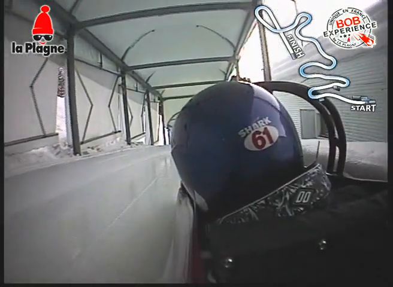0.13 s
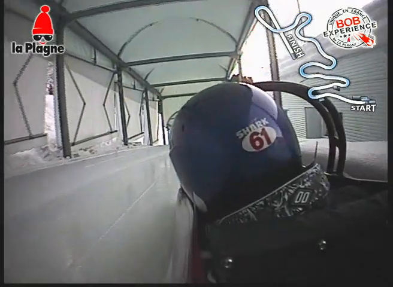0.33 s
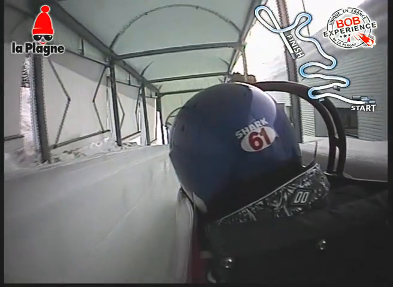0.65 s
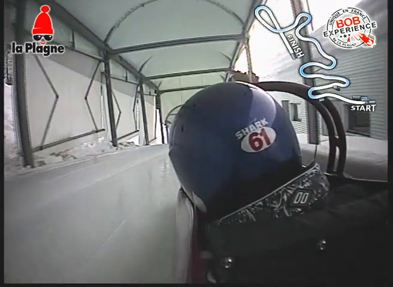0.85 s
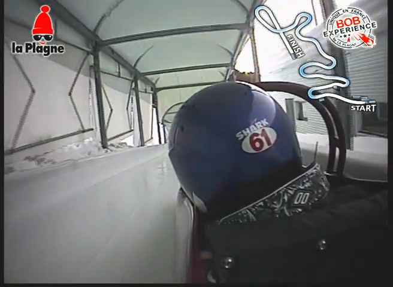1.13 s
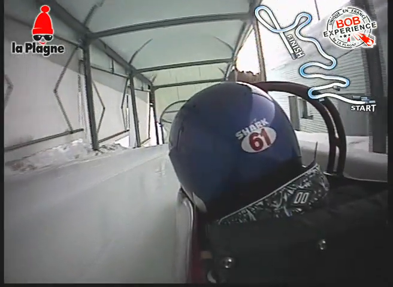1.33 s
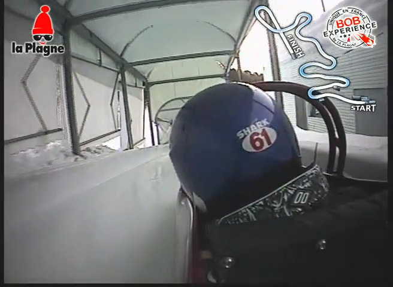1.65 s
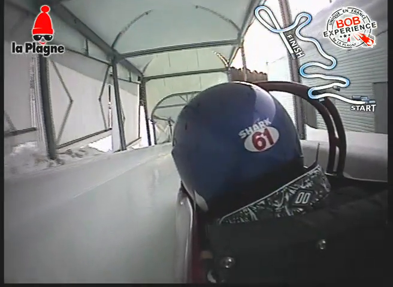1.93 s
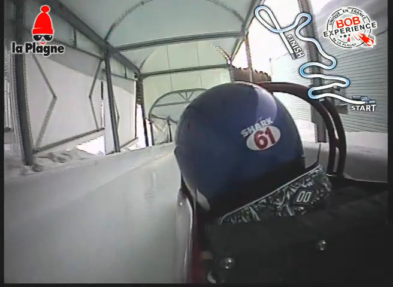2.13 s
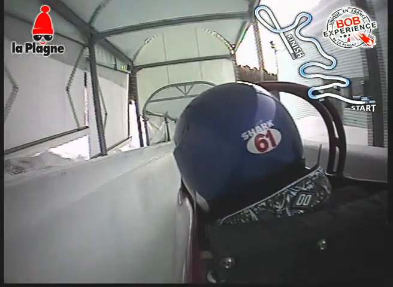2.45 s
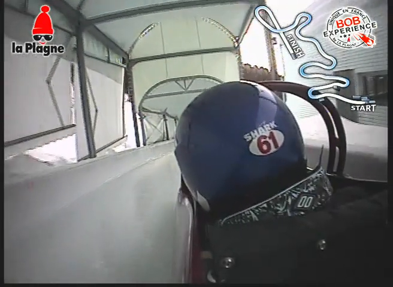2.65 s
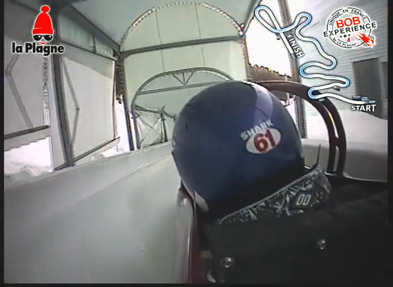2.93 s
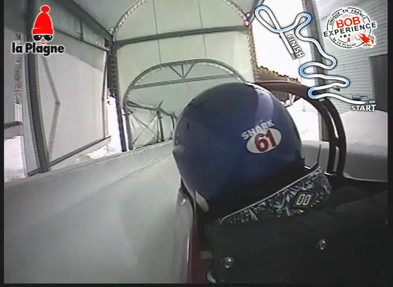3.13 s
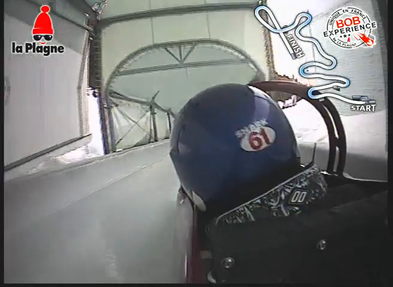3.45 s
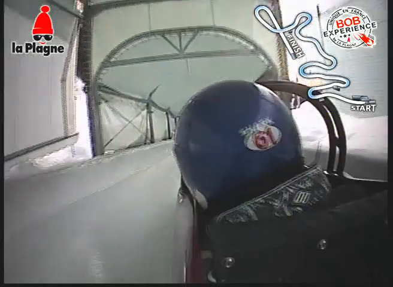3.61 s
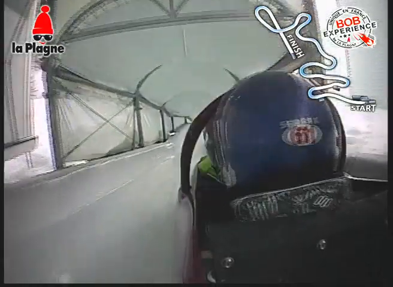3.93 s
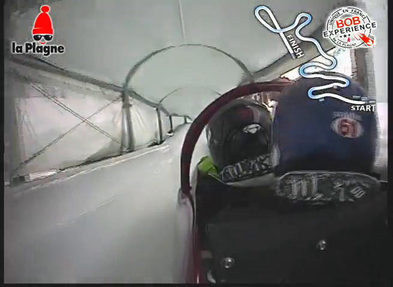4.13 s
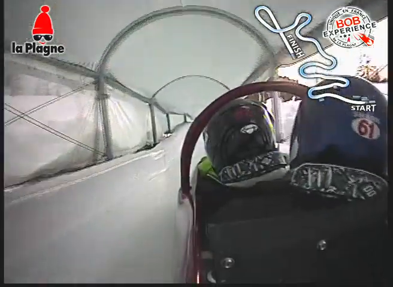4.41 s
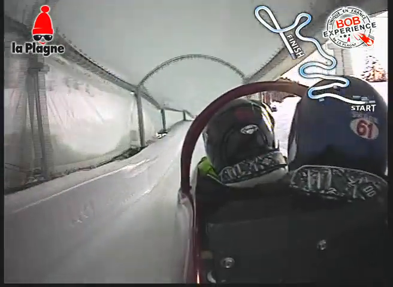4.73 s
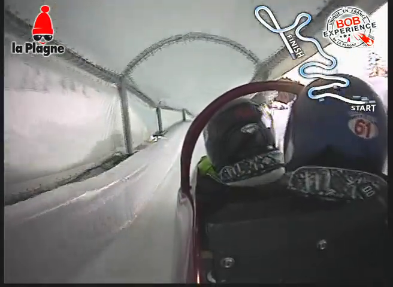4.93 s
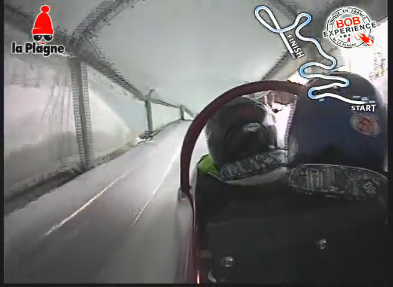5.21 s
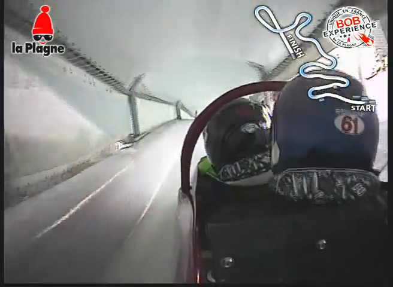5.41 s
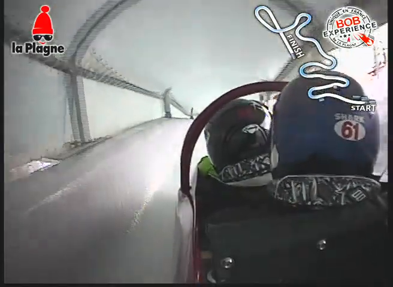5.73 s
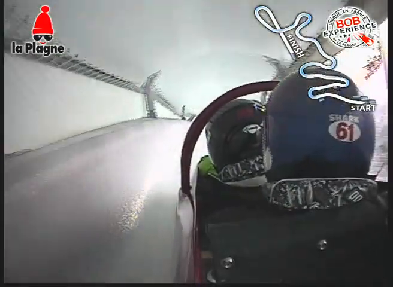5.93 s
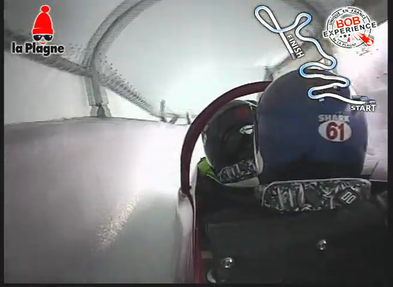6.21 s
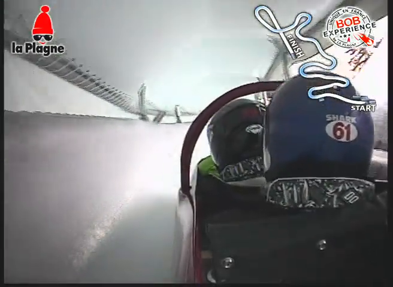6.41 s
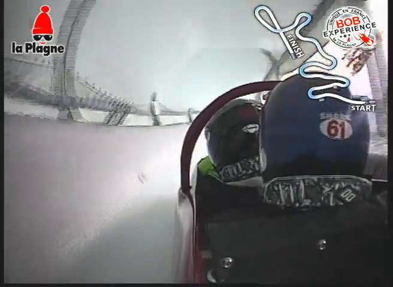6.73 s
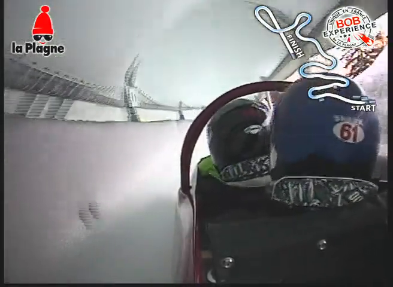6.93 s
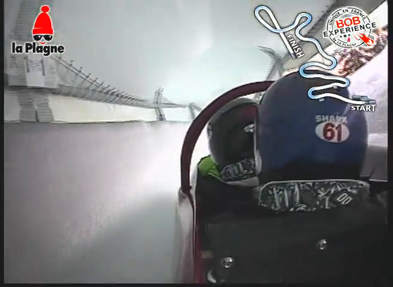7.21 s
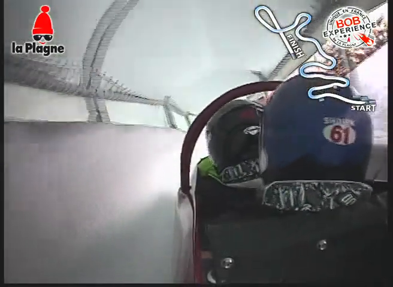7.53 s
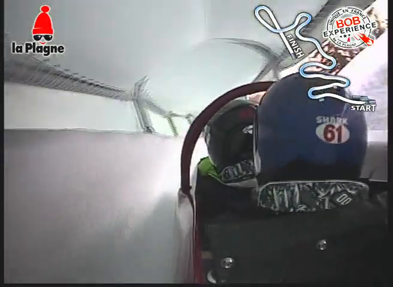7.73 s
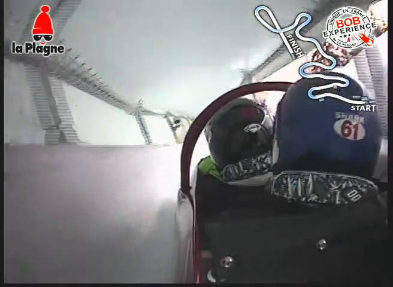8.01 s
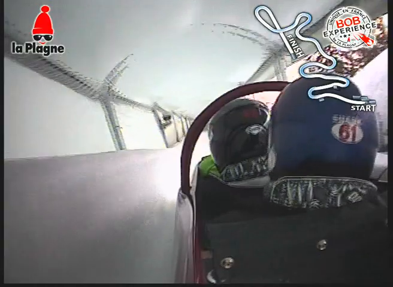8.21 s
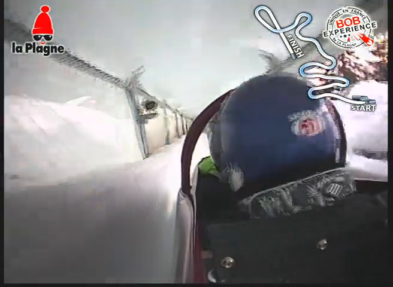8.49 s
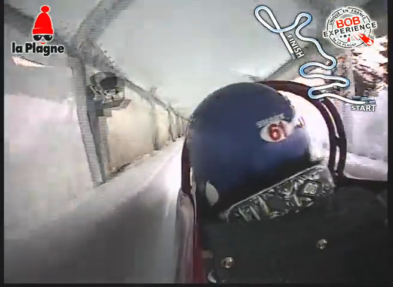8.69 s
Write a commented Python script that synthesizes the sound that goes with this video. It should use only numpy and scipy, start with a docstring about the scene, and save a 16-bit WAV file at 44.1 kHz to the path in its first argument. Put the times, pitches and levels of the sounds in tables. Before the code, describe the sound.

A microphone fixed on a sled hears runners on ice. Low, lumpy rumble and faint grinding run throughout, broken by irregular hollow thumps with brief panel rattle. The bumps begin fairly soft, become harder and denser, with one sharp clank and bright tick near two and a half seconds. Later the sway deepens and thin hissing skids appear. Dry, close sound in one channel only; the other holds just very faint hiss.

```python
"""On an ice track: a bobsleigh gathers speed, heard from a microphone on the sled; one channel is live, one idle.
Large and small bumps under the runners excite resonances of the hull, panels and fittings.
Filtered noise gives the sway, rumble and grinding, and the hiss that grows with speed, shaking and skids.
Short rings make ticks, wavering tones make squeaks, and the recorder adds a faint harmonic whine."""
import sys
import numpy as np
from scipy import signal
from scipy.fft import rfft, irfft, next_fast_len
from scipy.io import wavfile
from scipy.ndimage import uniform_filter1d

SR = 44100
rng = np.random.default_rng(int(sys.argv[2]) if len(sys.argv) > 2 else 0)


def materialize(psi):
    """Save the field psi as 16-bit PCM at rate SR to the path in sys.argv[1].

    A 1-D psi becomes a single channel; in a 2-D psi each row is a channel.
    """
    bounded = np.clip(np.atleast_2d(psi).T, -1, 1)
    quanta = np.round(bounded * 32767).astype(np.int16)
    wavfile.write(sys.argv[1], SR, quanta)


N = 390726
TIME = np.arange(N) / SR   # s


def from_db(db):
    """Decibels to gain."""
    return 10 ** (np.asarray(db) / 20)


def rms_one(x):
    """Scale to unit rms."""
    return x / np.sqrt(np.mean(x ** 2) + 1e-20)


def in_time(rows):
    """Interpolate each column of a curve at every sample."""
    s, *columns = np.transpose(rows)
    return [np.interp(TIME, s, c) for c in columns]


def cut(x, hz, kind, order=2):
    """Butterworth filter."""
    sos = signal.butter(order, np.clip(hz, 10, SR * 9 / 20), kind, fs=SR, output="sos")
    return signal.sosfilt(sos, x + 1e-18)


def drift(rate_hz):
    """Slow random curve, rms 1, with a new random value rate_hz times a second."""
    knots = rng.standard_normal(N // 20)
    return rms_one(np.interp(TIME * rate_hz, np.arange(len(knots)), knots))


def noise(spectrum):
    """Coloured noise, rms 1, falling steeply past both ends of the spectrum."""
    hz, db = np.transpose(spectrum)
    size = next_fast_len(N)
    f = np.maximum(np.arange(size // 2 + 1) * SR / size, 1)
    skirts = np.minimum(1, np.minimum(f / hz[0], hz[-1] / f)) ** 4
    gain = from_db(np.interp(np.log(f), np.log(hz), db)) * skirts
    white = rfft(rng.standard_normal(size))
    return rms_one(irfft(white * gain, size)[:N])


def grains(shape, per_s, spread_db):
    """Clicks at random moments, of uneven size and either sign."""
    out = np.zeros(shape)
    size, sign = rng.standard_normal((2, 9973))
    where = np.flatnonzero(rng.random(shape) < per_s / SR)
    pick = where % len(size)
    out.flat[where] = from_db(spread_db * np.minimum(size[pick], 2)) * np.sign(sign[pick])
    return out


def resonate(force, modes, scatter_db=0):
    """Parallel resonances of alternating sign; each row of force strikes each with its own strength."""
    out = 0
    for k, (hz, width_hz, db) in enumerate(modes):
        r = np.exp(-np.pi * width_hz / SR)
        w = 2 * np.pi * hz / SR
        top = (1 - r * r) * np.sin(w) * (-1) ** k
        scatter = scatter_db * rng.standard_normal(force.shape[:-1] + (1,))
        ring = signal.lfilter([0, top], [1, -2 * r * np.cos(w), r * r], force + 1e-18)
        out = out + from_db(db + scatter) * ring
    return out


def place(times, sounds):
    """Add each sound at its time."""
    out = np.zeros(N + SR)
    for s, sound in zip(times, sounds):
        start = max(round(s * SR), 0)
        out[start:start + len(sound)] += sound
    return out[:N]


def at_levels(sounds, db):
    """Give each sound the energy of its level held for one level window."""
    level_window_s = 0.03
    energy = np.sum(sounds ** 2, axis=1) / (level_window_s * SR)
    return sounds * (from_db(db) / np.sqrt(energy + 1e-20))[:, None]


def contacts(lengths_s, first_blow, per_s, spread_db, fade_db, settle_s, tail_db, tail_s):
    """Force of each bump: one blow, chatter fading while the runner crosses, a weak dying rattle."""
    t = TIME[:SR // 8]
    crossed = np.minimum(t / lengths_s[:, None], 1)
    after = np.maximum(t - lengths_s[:, None], 0)
    pressure = from_db(-fade_db * crossed) * np.exp(-after / settle_s)
    pressure = pressure + from_db(tail_db) * np.exp(-after / tail_s)
    attack = np.minimum(t / 0.0016, 1)
    chatter = pressure * attack * grains(after.shape, per_s, spread_db)
    force = chatter / np.sqrt(np.sum(chatter ** 2, axis=1, keepdims=True) + 1e-12)
    force[:, SR // 400] += first_blow * np.exp(-lengths_s / 0.028)   # short bumps hit hardest
    return force


# big bumps in the ice: [t/s, chatter length/s, relative hull level/dB, relative panel level/dB]
BIG_BUMPS = [(0.016, 0.028, -25, -54.5), (0.095, 0.026, -16.5, -41.5), (0.179, 0.067, -29, -45),
             (0.276, 0.015, -28.5, -48.5), (0.365, 0.03, -21.5, -44), (0.447, 0.026, -22, -39),
             (0.487, 0.034, -22, -47.5), (0.658, 0.031, -13.5, -32), (0.697, 0.027, -20, -36),
             (0.838, 0.028, -16, -33.5), (0.872, 0.031, -15.5, -40), (0.993, 0.025, -16, -36),
             (1.153, 0.022, -16, -32), (1.297, 0.033, -24.5, -37), (1.331, 0.018, -18.5, -31),
             (1.4, 0.0056, -21.5, -37.5), (1.463, 0.025, -8, -28.5), (1.591, 0.029, -24, -37),
             (1.736, 0.025, -18.5, -37), (1.908, 0.019, -15, -29), (2.003, 0.027, -17, -32),
             (2.112, 0.02, -13, -34.5), (2.15, 0.026, -21.5, -37), (2.25, 0.02, -14, -34),
             (2.368, 0.0071, -9.5, -24.5), (2.461, 0.071, -23.5, -42.5), (2.694, 0.018, -15.5, -28.5),
             (2.772, 0.021, -16, -37), (2.892, 0.025, -16, -33.5), (2.999, 0.012, -23.5, -42),
             (3.204, 0.031, -18, -33), (3.354, 0.024, -17.5, -31.5), (3.448, 0.02, -15, -34),
             (3.485, .007, -14, -33.5), (3.526, 0.0047, -20.5, -40), (3.582, 0.017, -18.5, -38.5),
             (3.616, 0.016, -13, -30), (3.799, 0.015, -15, -32.5), (3.818, 0.0077, -18.5, -33),
             (3.903, 0.0031, -25.5, -36.5), (3.966, 0.031, -14.5, -32), (4.06, 0.016, -14, -35.5),
             (4.135, .02, -19, -39.5), (4.198, 0.0087, -19.5, -37.5), (4.225, 0.015, -18.5, -35.5),
             (4.31, 0.012, -16.5, -35.5), (4.37, 0.021, -16, -35.5), (4.409, 0.011, -14.5, -33),
             (4.495, 0.0051, -22.5, -37), (4.571, 0.018, -15, -30.5), (4.661, 0.0049, -16.5, -26.5),
             (4.753, 0.0099, -16.5, -28), (4.933, 0.049, -14.5, -36), (5.038, 0.013, -17.5, -36.5),
             (5.127, 0.032, -13.5, -32.5), (5.189, 0.031, -14, -32.5), (5.227, 0.014, -17, -24),
             (5.345, 0.033, -19, -41.5), (5.462, 0.029, -16.5, -38), (5.568, 0.032, -14.5, -26),
             (5.648, .021, -15.5, -31), (5.693, 0.012, -13.5, -35), (5.865, 0.026, -15.5, -32),
             (6.222, 0.034, -16.5, -40), (6.314, 0.01, -18.5, -48), (6.467, 0.043, -14, -33),
             (6.6, 0.033, -12, -28.5), (6.774, 0.011, -11, -34), (6.959, 0.041, -16, -29.5),
             (7.129, .003, -12, -38), (7.201, 0.12, -12.5, -31.5), (7.304, 0.0043, -17, -31.5),
             (7.394, 0.005, -18, -30), (7.421, 0.028, -15, -37), (7.602, 0.029, -14.5, -29),
             (7.727, 0.033, -13.5, -33.5), (7.822, .025, -10.5, -30), (7.906, 0.03, -15.5, -36.5),
             (7.983, 0.016, -12.5, -33), (8.151, 0.015, -11.5, -33), (8.252, 0.025, -13.5, -32.5),
             (8.333, 0.067, -16.5, -33), (8.413, 0.0098, -17.5, -32.5), (8.467, .007, -17.5, -37.5),
             (8.676, 0.038, -13.5, -33.5), (8.786, .03, -10.5, -25.5)]
# resonances of hull, panels and fittings: [f/Hz, width/Hz, relative level/dB]
HULL_MODES = [(95.7, 5, -18), (158.8, 24, 2), (205.1, 39.2, 0), (259.7, 71, -7), (298.4, 27.6, -6.5),
              (375.6, 55, -17)]
PANEL_MODES = [(461.6, 62.6, 3), (559.4, 53, 3.5), (759, 105, -4.5), (908, 79, -11.5), (1068, 79, -6),
               (1290, 300, -17.5), (1467, 142, -14)]
FITTING_MODES = [(1748, 77, 4.5), (1872, 49, 5), (2010, 270, -2), (2673, 49, -5), (2770, 830, -18.5)]
# metal that only a hard knock sets ringing: [f/Hz, width/Hz, relative level/dB]
CLANK_MODES = [(2580, 140, -2), (2850, 320, -8.5)]
HARD_KNOCK_DB = -25.5   # panel level of a hard knock
# fittings re panels: level at the start, rise as the sled speeds up
FITTINGS_UNDER_DB, FITTINGS_RISE_DB_PER_S = -19, 0.2261


def jolts(bumps, hull_gain_db=-3.0, panel_gain_db=-0.28, hardening=0.56, upper_hull_db=1,
          upper_hardening=0.5, clank_db=-1, scatter_db=1.75):
    """Bumps thump the heavy hull; the lighter panels and fittings chatter and stop sooner."""
    s, lengths_s, hull_db, panel_db = np.transpose(bumps)
    lengths_s = np.maximum(lengths_s, 1 / SR)
    # hard knocks start sharply, wake the upper hull modes and clank
    hardness = from_db(hardening * (panel_db - HARD_KNOCK_DB))
    heave = contacts(lengths_s, first_blow=2.35, per_s=900, spread_db=3.5,
                     fade_db=1.5, settle_s=0.0076, tail_db=-27, tail_s=0.028)
    rattle = contacts(lengths_s, first_blow=0.83 * hardness, per_s=1000, spread_db=4.5,
                      fade_db=9.0, settle_s=0.0083, tail_db=-19, tail_s=0.011)

    upper_gain = from_db(upper_hull_db) * hardness[:, None] ** upper_hardening
    hull = resonate(heave, HULL_MODES[:2]) + upper_gain * resonate(heave, HULL_MODES[2:])
    hull = cut(cut(hull, 610, "low"), 79, "high")

    panels = resonate(rattle, PANEL_MODES, scatter_db)
    panels = cut(cut(panels, 2160, "low", order=4), 425, "high", order=3)

    clank_gain = from_db(clank_db) * hardness[:, None] ** 2
    metal = resonate(rattle, FITTING_MODES, scatter_db) - clank_gain * resonate(rattle, CLANK_MODES)
    fittings = cut(cut(metal, 3200, "low", order=4), 1400, "high")
    fittings_db = panel_db + FITTINGS_UNDER_DB + FITTINGS_RISE_DB_PER_S * s

    return place(s, at_levels(hull, hull_db + hull_gain_db)
                 + at_levels(panels, panel_db + panel_gain_db)
                 + at_levels(fittings, fittings_db))


# the sled hops: lead time over which the runners go light before a big bump, full level change
LIGHT_S, LIGHT_DB = 0.05, -1.5


def lightness(t):
    """From 0 to 1 as the runners go light ahead of the next big bump; back to 0 when they hit it."""
    hits = np.append(np.sort(np.transpose(BIG_BUMPS)[0]), np.inf)
    wait_s = hits[np.searchsorted(hits, t)] - t
    return np.clip(2 * (1 - wait_s / LIGHT_S), 0, 1)


# steady running: [t/s, relative rumble level/dB, relative grinding level/dB]
RUNNING_LEVELS = [(0.0, -34, -54.5), (0.27, -32.5, -51.5), (0.71, -44, -62), (0.89, -30.5, -47),
                  (1.18, -26.5, -47), (2.52, -34, -53.5), (3.5, -25, -43.5), (3.97, -32, -50),
                  (4.47, -25, -42.5), (4.88, -28, -48), (5.72, -26.5, -44), (5.97, -27.5, -46.5),
                  (6.59, -24, -42), (6.96, -28, -48.5), (7.38, -25, -43.5), (7.8, -24, -42.5),
                  (8.34, -29, -46.5), (8.86, -26, -42.5)]
# level of the small bumps: hull re rumble, panels re grinding, rms spread
SMALL_HULL_DB, SMALL_PANEL_DB, SMALL_SPREAD_DB = 0, 1, 2
SMALL_PER_S, SMALL_LENGTH_S = 16, 0.024   # slot rate, mean chatter length


def small_bumps():
    """Random bumps, as strong as the ice is rough there, laid out as BIG_BUMPS; light runners miss them."""
    when, length, strength = rng.random((400, 3)).T
    s = (np.arange(len(when)) + when) / SMALL_PER_S
    at, rumble_db, grind_db = np.transpose(RUNNING_LEVELS)
    luck_db = SMALL_SPREAD_DB * np.sqrt(3) * (2 * strength - 1)
    hull_db = np.interp(s, at, rumble_db) + SMALL_HULL_DB + luck_db
    panel_db = np.interp(s, at, grind_db) + SMALL_PANEL_DB + luck_db
    rows = np.column_stack([s, SMALL_LENGTH_S * (0.5 + length), hull_db, panel_db])
    return rows[(lightness(s) == 0) & (s < N / SR)]


# slow heaving of the whole sled, strongest deep in the bend: [t/s, relative level/dB]
SWAY_LEVELS = [(0, -46), (.6, -37.5), (1.2, -33.5), (2.6, -40), (3.3, -36), (6.4, -35), (7.3, -32.5),
               (7.7, -25.5), (8.2, -32.5), (8.86, -30.5)]
# noise spectra of sway, rumble and grinding: [f/Hz, relative density/dB per Hz]
SWAY_SPECTRUM = [(12, -9), (31, -1.5), (45, 3), (62, -1), (80, 7.5), (100, 7.5), (130, -22)]
RUMBLE_SPECTRUM = [(100, -12), (130, -1), (158, 1.5), (185, -2.5), (210, -4.5), (250, -8), (295, -10.5),
                   (360, -19), (480, -27)]
GRIND_SPECTRUM = [(430, -3.5), (545, 3), (630, -6.5), (750, -5), (930, -13), (1075, -11), (1190, -17.5),
                  (1480, -17.5), (1590, -36.5), (1840, -20.5), (2200, -27.5), (3000, -30.5), (3500, -40)]


def runners(sway_gain_db=-2.0, rumble_gain_db=-0.27, grind_gain_db=-2.0, clatter_gain_db=-8.0,
            fitting_share_db=-14, lumpy_db=3.02, gritty_db=3.0, rumble_light_share=0.83):
    """Fine ice roughness keeps the sled swaying, rumbling and grinding, its loose parts clattering."""
    rumble_db, grind_db = in_time(RUNNING_LEVELS)
    sway_db, = in_time(SWAY_LEVELS)
    roughness = drift(60)
    light_db = LIGHT_DB * uniform_filter1d(lightness(TIME), size=SR // 200)

    sway_db = sway_db + sway_gain_db + lumpy_db * drift(12)
    sway = from_db(sway_db) * noise(SWAY_SPECTRUM)
    rumble_db = rumble_db + rumble_gain_db + rumble_light_share * light_db + lumpy_db * roughness
    rumble = from_db(rumble_db) * noise(RUMBLE_SPECTRUM)

    taps = grains(N, per_s=220, spread_db=3.5)
    loose = resonate(taps, PANEL_MODES) + from_db(fitting_share_db) * resonate(taps, FITTING_MODES)
    clatter = cut(rms_one(cut(loose, 3000, "low", order=4)), 430, "high", order=3)
    scrape = from_db(grind_gain_db) * noise(GRIND_SPECTRUM) + from_db(clatter_gain_db) * clatter
    return sway + rumble + from_db(grind_db + light_db + gritty_db * roughness) * scrape


# runners skid sideways and shave the ice: [t/s, length/s, relative hiss level/dB]
SKID_EVENTS = [(3.197, .035, -59.5), (3.267, 0.037, -67), (4.043, 0.055, -59.5), (4.91, 0.079, -68),
               (5.135, 0.15, -62.5), (5.33, 0.029, -61), (5.558, 0.17, -64.5), (6.445, 0.064, -61),
               (6.59, 0.036, -60), (6.727, 0.052, -60.5), (7.29, 0.033, -60), (7.411, 0.035, -62),
               (7.58, 0.058, -55.5), (7.803, 0.25, -64), (8.126, 0.041, -58.5), (8.218, 0.081, -58.5),
               (8.323, 0.072, -57.5), (8.45, 0.039, -57), (8.54, 0.061, -62), (8.642, 0.2, -62)]
SKID_ATTACK_S, SKID_RELEASE_S = 0.0065, 0.005


def skidding():
    """Gain of the skids: each swells, holds until its length is over, then dies away exponentially."""
    gain = 0
    for s, length_s, db in SKID_EVENTS:
        swell = np.clip((TIME - s) / SKID_ATTACK_S, 0, 1)
        decay = np.exp(-np.clip((TIME - s - length_s) / SKID_RELEASE_S, 0, 20))
        gain = gain + from_db(db) * swell * decay
    return gain


# spectrum of the ice hiss: [f/Hz, relative density/dB per Hz]
HISS_SPECTRUM = [(1800, 1), (3000, 0), (4600, 2), (6500, 1), (9500, -4), (11200, -2.5), (13000, -14.5)]
# gliding hiss: level at the start, rise with speed, shaking at which it has that level
HISS_DB, HISS_RISE_DB_PER_S, USUAL_SHAKE_DB = -77.5, 1.0, -25


def ice_hiss(shake, load_share=0.8, skid_gain_db=-1.0, flutter_db=2.0, grain_db=2.0, chip_db=7):
    """Steel shaves ice in gritty spurts, harder with speed, skids and jolt load; chips snap off."""
    shake_rms = np.sqrt(uniform_filter1d(shake ** 2, size=SR // 80) + 1e-8)
    load = shake_rms / from_db(USUAL_SHAKE_DB)
    gliding = from_db(HISS_DB + HISS_RISE_DB_PER_S * TIME) * load ** load_share
    grit = from_db(flutter_db * drift(140) + grain_db * drift(700))
    chips = cut(grains(N, per_s=40, spread_db=2), [4500, 10000], "band", order=4)
    gain = np.hypot(gliding, from_db(skid_gain_db) * skidding())
    return gain * (grit * noise(HISS_SPECTRUM) + from_db(chip_db) * chips)


# sharp ticks, most on top of a hard jolt: [t/s, relative level/dB]
TICK_EVENTS = [(1.472, -42), (1.924, -45), (2.1243, -43), (2.381, -21.5), (3.493, -43), (3.6306, -42),
               (4.669, -43), (5.946, -47), (6.072, -46.5), (6.7852, -40), (7.9, -46), (7.9834, -36),
               (8.158, -40), (8.263, -44)]


def ticks(gain_db=11.0, ring_hz=9500, width_hz=1900, snap_db=-21):
    """Tiny bright snaps: clicks through one broad resonance, over in a millisecond."""
    s, db = np.transpose(TICK_EVENTS)
    clicks = place(s, from_db(db + gain_db)[:, None])
    ring = resonate(clicks, [(ring_hz, width_hz, 12)])
    snap = cut(ring + from_db(snap_db) * clicks, 4000, "high", order=3)
    return cut(snap, 10600, "low", order=12)


# faint frame squeaks: [t/s at the loudest, relative level/dB]
SQUEAK_EVENTS = [(.018, -75), (.517, -70), (.562, -71), (1.542, -74), (1.814, -68), (2.421, -72),
                 (3.685, -68), (7.779, -65)]
SQUEAK_HZ = 3000


def squeaks(length_s=0.051, waver_hz=45, rough_db=5.0):
    """The flexing frame gives short, slightly rough squeaks whose pitch wavers."""
    s, db = np.transpose(SQUEAK_EVENTS)
    pitch_hz = SQUEAK_HZ + waver_hz * drift(110)
    swells = from_db(db)[:, None] * np.hanning(round(length_s * SR))
    envelope = place(s - length_s / 2, swells) * from_db(rough_db * drift(250))
    return np.sqrt(2) * envelope * np.sin(2 * np.pi * np.cumsum(pitch_hz) / SR)


def scene():
    """Everything reaches one microphone on the sled; the second channel stays empty."""
    shake = jolts(BIG_BUMPS) + runners() + jolts(small_bumps())
    sled = shake + ice_hiss(shake) + ticks() + squeaks()
    return np.array([2 * sled, np.zeros(N)])


# recorder whine, one row per harmonic from the third up:
# [steady tone level/dB, depth of the ripple it puts on the sound/dB]
WHINE_HARMONICS = [(-79, -54), (-78.5, -54.5), (-75.5, -60), (-84, -50), (-76, -51.5), (-85, -50)]
WHINE_HZ, CUTOFF_HZ = 1500, 12800   # whine fundamental, top of the recorder's band


def record(dry, idle_db=-72):
    """Recorder: peaks round off, a whine ripples the live channel, the idle one hisses, the top is cut."""
    live = dry[0] / (1 + dry[0] ** 8) ** (1 / 8)
    phase = 2 * np.pi * WHINE_HZ * TIME
    whine = 0
    for k, (tone_db, ripple_db) in enumerate(WHINE_HARMONICS, 3):
        whine = whine + np.sin(k * phase) * (from_db(tone_db) + from_db(ripple_db) * live)
    idle = from_db(idle_db) * rng.standard_normal(N)
    top_cut = signal.ellip(10, 0.2, 80, CUTOFF_HZ, fs=SR, output="sos")
    return signal.sosfilt(top_cut, [live + whine, idle])


dry = scene()
out = record(dry)
materialize(out)
```